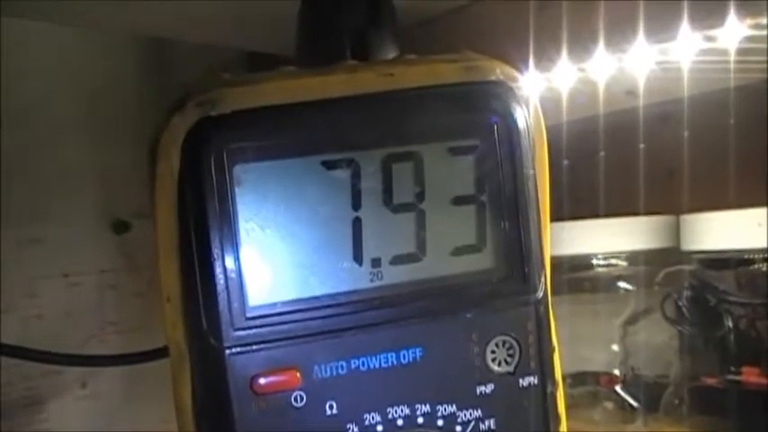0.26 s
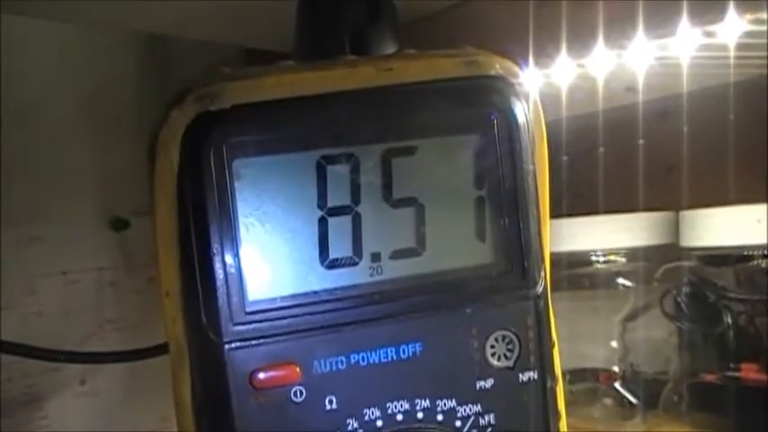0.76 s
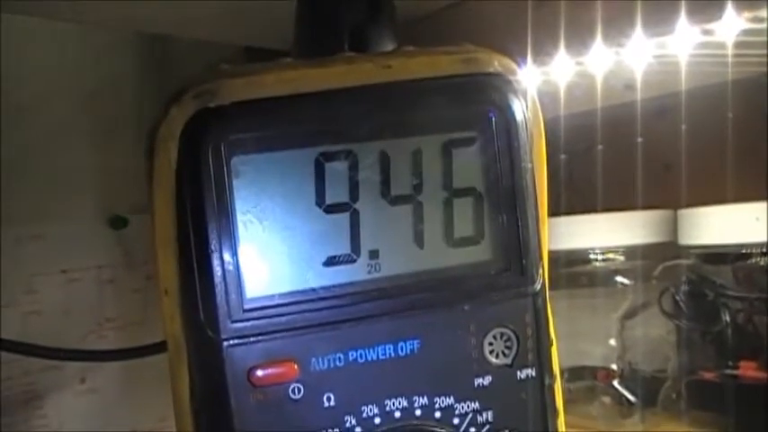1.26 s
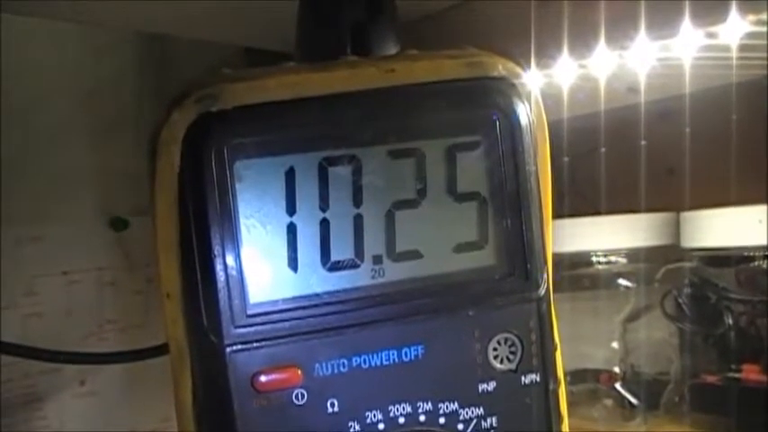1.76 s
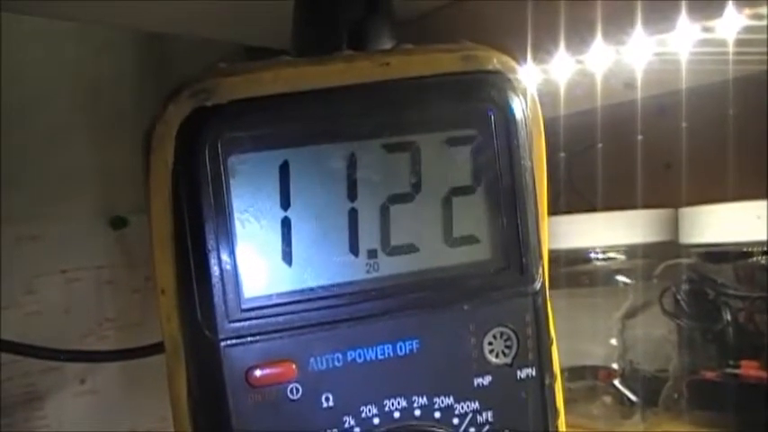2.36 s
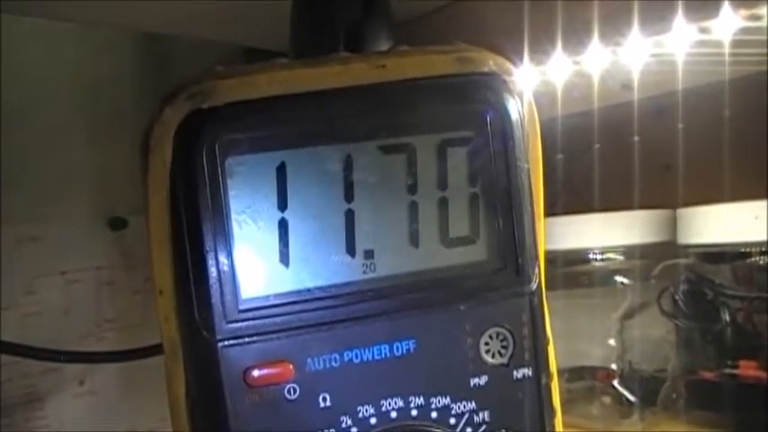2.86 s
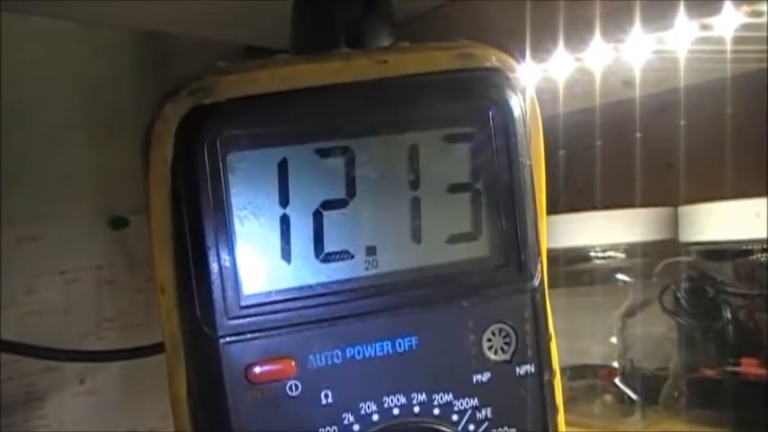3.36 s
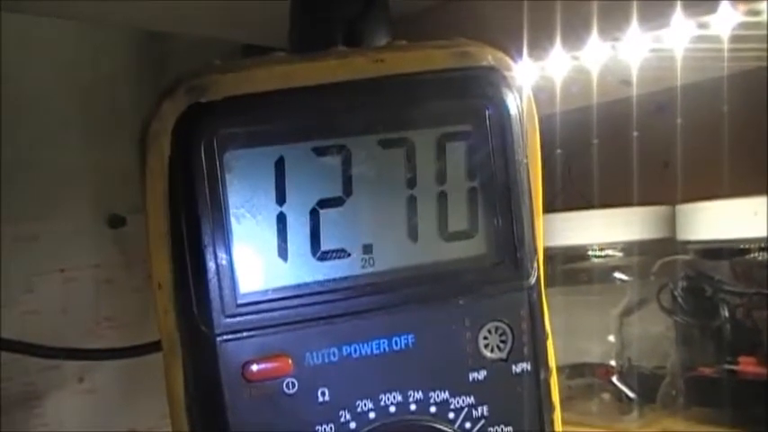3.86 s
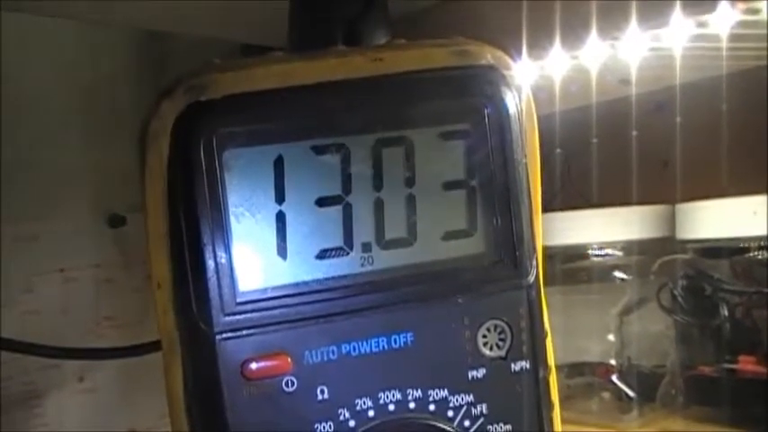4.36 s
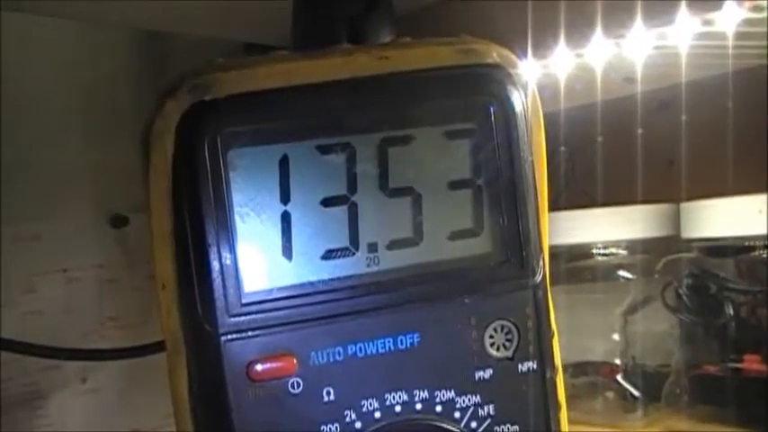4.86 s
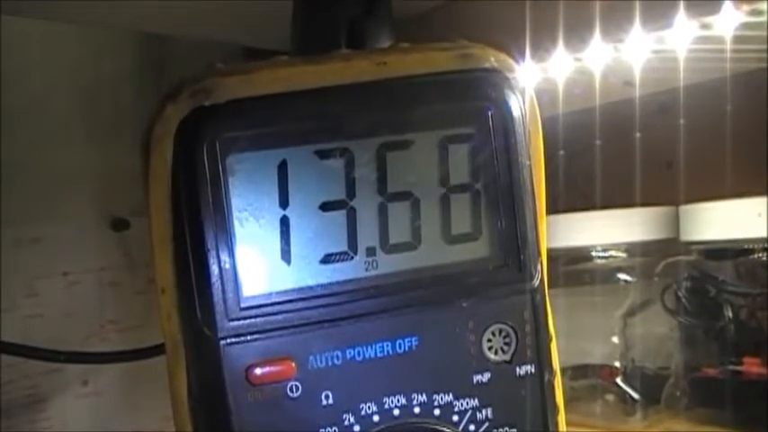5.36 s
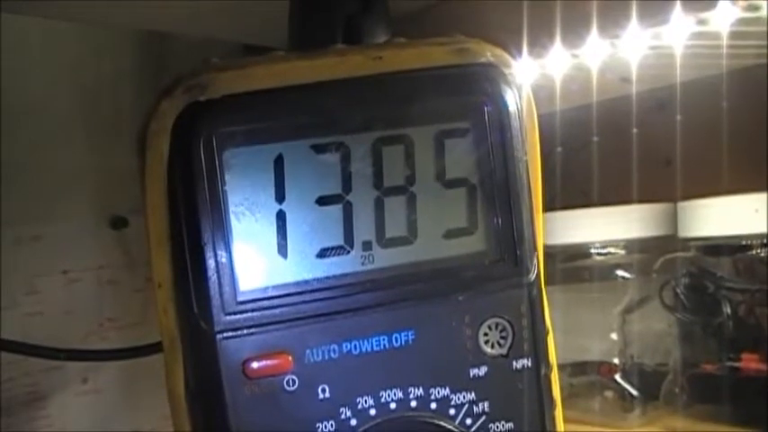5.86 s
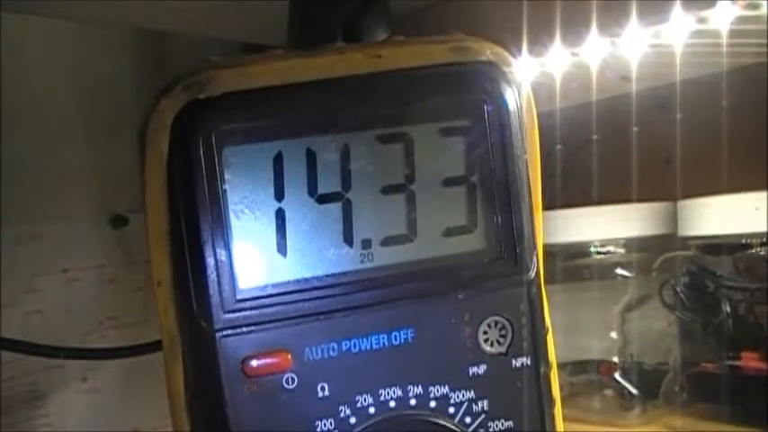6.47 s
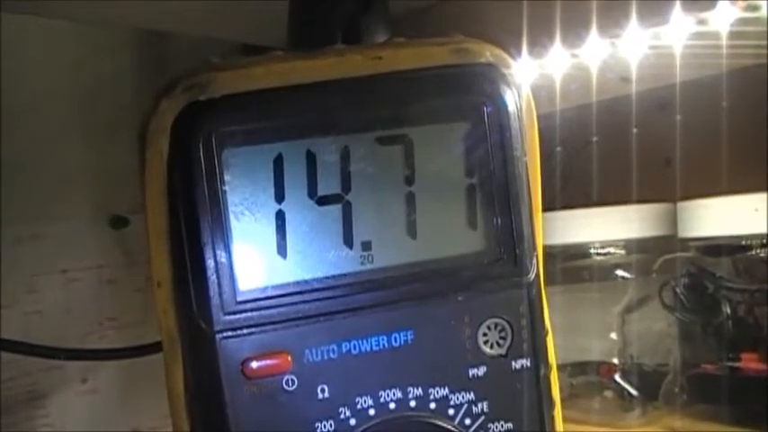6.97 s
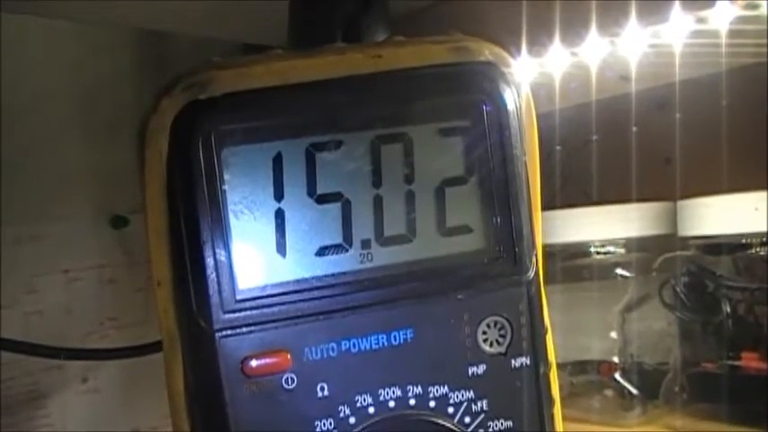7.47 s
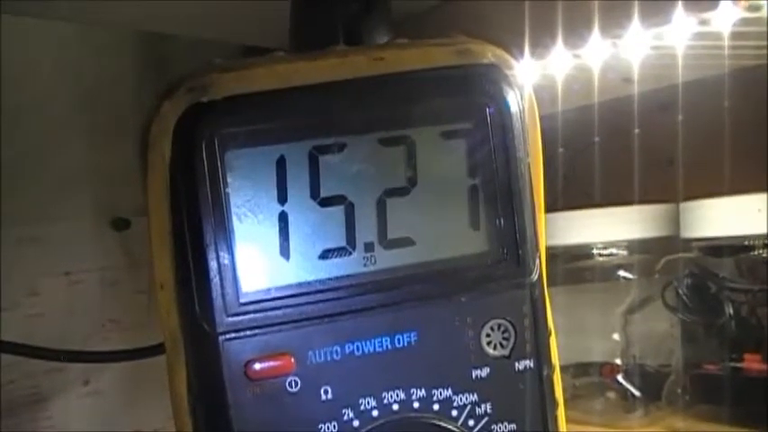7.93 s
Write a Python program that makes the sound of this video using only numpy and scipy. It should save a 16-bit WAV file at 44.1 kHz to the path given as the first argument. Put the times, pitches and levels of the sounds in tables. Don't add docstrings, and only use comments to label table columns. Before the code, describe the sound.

Steady electronic frying hiss, high and crackly, rises gradually as output is turned up, with quiet low fan drone and soft room noise beneath.

```python
import sys
import numpy as np
from scipy import signal
from scipy.fft import rfft, irfft, next_fast_len
from scipy.io import wavfile
from scipy.ndimage import map_coordinates

SR = 44100
rng = np.random.default_rng(int(sys.argv[2]) if len(sys.argv) > 2 else 0)


def voltage_ratio(level):
    return 10 ** (np.asarray(level, float) / 20)


def store_wav(level_fs):
    pcm = np.round(np.clip(np.atleast_2d(level_fs), -1, 1) * 32767)
    wavfile.write(sys.argv[1], SR, pcm.T.astype(np.int16))


N = 361619


def unit(x):
    return x / np.sqrt(np.mean(x ** 2) + 1e-20)


def along(points, hz):
    f, v = np.transpose(points)
    return np.interp(np.log(hz + 1), np.log(f + 1), v)


def wobble(rate):
    coarse = np.arange(0, N + 32, 32)
    knots = rng.standard_normal(int(N * rate / SR) + 4)
    return np.interp(np.arange(N), coarse, map_coordinates(knots, [coarse * rate / SR]))


def bumps(times, heights, width_s):
    t = np.arange(N) / SR
    return sum(h * np.exp(-0.5 * ((t - s) / width_s) ** 2) for s, h in zip(times, heights))


def filtered(x, response):
    m = next_fast_len(N + SR // 2)
    spectrum = rfft(x, m) * response(np.fft.rfftfreq(m, 1 / SR))
    return irfft(spectrum, m)[..., :N]


def humps_db(modes, hz):
    return sum(db / (1 + (2 * (hz - centre) / width) ** 4) for centre, width, db in modes)


def causal(level_db):
    cepstrum = irfft(np.log(voltage_ratio(level_db)))
    half = len(cepstrum) // 2
    cepstrum[1:half] *= 2
    cepstrum[half + 1:] = 0
    return np.exp(rfft(cepstrum))


def tones(lines, base_hz, drift_rate):
    t = np.arange(N) / SR
    out = np.zeros((2, N))
    for multiple, left_db, right_db, lag, loose in lines:
        hz = round(multiple) * base_hz
        wander = (wobble(drift_rate) + 1j * wobble(drift_rate)) / np.sqrt(2)
        sway = np.sqrt(1 - loose ** 2) + loose * wander
        tone = np.sqrt(2) * sway * np.exp(2j * np.pi * (hz * t + rng.random()))
        out[0] += voltage_ratio(left_db) * tone.real
        out[1] += voltage_ratio(right_db) * (tone * np.exp(-1j * lag)).real
    return out


def microphone_floor():
    # (frequency [Hz], level [dB per Hz])
    floor_colour = [(20, -36), (35, -20), (60, -24), (130, -10), (300, -4), (500, -1), (1000, -3.5),
                    (1600, -5.5), (2300, -10.5), (3000, -16), (5000, -15), (15000, -22)]
    # (frequency [Hz], likeness [-1 to 1])
    likeness = [(50, 0.66), (200, -0.44), (700, -0.31), (1400, 0.18), (3000, -0.57)]

    def mid_and_side(hz):
        angle = np.arccos(along(likeness, hz)) / 2
        return voltage_ratio(along(floor_colour, hz)) * np.array([np.cos(angle), np.sin(angle)])

    mid, side = filtered(rng.standard_normal((2, N)), mid_and_side)
    return voltage_ratio(-58.5) * unit(np.array([mid + side, mid - side]))


def mains_hum():
    # (multiple [-], left level [dB], right level [dB], right lag [rad], unsteadiness [0-1])
    hum_lines = [(1, -89, -92, .2, .2), (2, -79, -76, 0.54, 0.14), (4, -83, -82.5, 0.18, 0.4)]
    return tones(hum_lines, 59.95, drift_rate=4)


def fan_orders():
    # (order [-], left level [dB], right level [dB], right lag [rad], unsteadiness [0-1])
    fan_lines = [(1, -89, -91, 0.48, 0.33), (4, -67.5, -66, 0.38, 0.034), (5, -71.5, -70, 0.51, 0.24),
                 (7, -75.5, -73.5, -1.5, 0.45), (8, -83, -91, -1.4, .3), (14, -82, -78, 0.81, 0.44),
                 (20, -75.5, -101, 0.32, 0.99)]
    return tones(fan_lines, 94.36, drift_rate=9)


def loose_fan():
    # (frequency [Hz], left level [dB], right level [dB], right lag [rad], unsteadiness [0-1])
    rattle_lines = [(135.4, -91, -83, 1.5, .3), (846, -80, -76, 0.5, 1), (879, -72, -71.5, 1.5, 0.48),
                    (930, -85, -81, 1, 0.5), (1020, -87, -87, -4.5, 0), (1170, -95, -99, -3, 0),
                    (1194, -88, -74, 3, 0)]
    return tones(rattle_lines, 1, drift_rate=16)


def camera_motor():
    # (multiple [-], left level [dB], right level [dB], right lag [rad], unsteadiness [0-1])
    motor_lines = [(1, -83, -96, 1, 0.18), (2, -71.5, -65, 3, 0.1), (3, -69, -68.5, 1.08, 0.16),
                   (4, -84, -94, -4.5, .2), (6, -82, -71, -0.9, 0.49)]
    return tones(motor_lines, 360.87, drift_rate=5)


def scuffs():
    # (time [s], length [s], centre [Hz], width [Hz], level [dB])
    strokes = [(1.42, .12, 1600, 200, -67), (1.55, 0.43, 1180, 250, -67), (2.45, 0.17, 1280, 250, -69),
               (2.65, .12, 1630, 100, -68), (3.38, .08, 1250, 250, -70), (4.376, .4, 1520, 1610, -63),
               (4.68, .12, 1150, 250, -66), (5.288, 0.077, 2080, 350, -65), (5.78, 0.34, 1250, 250, -70),
               (8.03, .25, 1230, 200, -68), (4.76, .06, 880, 150, -67)]
    out = np.zeros(N)
    for s, length, centre, width, db in strokes:
        resonance = lambda hz: 1 / (1 + (2 * (hz - centre) / width) ** 2)
        rub = unit(filtered(rng.standard_normal(N), resonance))
        out += rub * bumps([s], [voltage_ratio(db)], 0.43 * length)
    return out


def paths(hz, contrast):
    # (frequency [Hz], level [dB per Hz])
    broad_left = [(1200, -40), (2000, -15), (2500, -8), (3600, -11), (5000, -2), (6500, 3), (6650, -3),
                  (7500, 4), (9000, 5), (10500, 8), (11500, 1), (13000, -3), (15200, -5), (15750, -11)]
    broad_right = [(1200, -40), (2000, -15), (2500, -8), (3600, -11), (5000, -2), (6500, 3), (6650, 1),
                   (7500, 2), (9000, 1), (10500, 8), (11500, -3), (13000, 1), (15200, -1), (15750, -10)]
    # (centre [Hz], width [Hz], height [dB])
    case_modes = [(2790, 70, 4), (2880, 50, -2), (3030, 130, 8), (3190, 50, 4), (3470, 90, 4),
                  (3550, 40, -4), (3630, 70, 3), (3730, 70, 2), (3810, 70, 6), (4030, 70, -10),
                  (4150, 60, 3), (4290, 90, 5), (4420, 50, 5), (4540, 50, 3), (4730, 130, -16),
                  (4840, 60, -3), (4990, 70, -5), (5160, 110, -5), (5420, 90, -8), (5550, 110, 4),
                  (5690, 170, -2), (5800, 60, 4), (5890, 110, -4), (6090, 190, -5), (6350, 100, -3),
                  (6560, 130, -7)]
    # (centre [Hz], width [Hz], height [dB])
    coil_left = [(6740, 260, 4), (7090, 40, -3), (7280, 50, -3), (7530, 70, 5), (7710, 140, 3),
                 (8010, 90, -3), (8230, 250, 4), (8350, 130, -6), (8770, 90, 4), (8870, 380, 7),
                 (9030, 80, -11), (9340, 80, -5), (9480, 60, -4), (9670, 120, 5), (9800, 60, -2),
                 (10000, 130, 7), (10180, 50, -7), (10280, 50, -2), (10420, 130, -7), (11070, 290, -3),
                 (11910, 80, 6), (12040, 50, -3), (12400, 120, 3), (12570, 80, 4), (12940, 210, 6),
                 (13220, 180, 8), (13760, 290, 6), (14100, 150, 5), (14640, 150, 4), (14820, 50, 2)]
    coil_right = [(6940, 140, -5), (7180, 110, 7), (7590, 270, 6), (8010, 140, 6), (8470, 70, 3),
                  (8810, 380, 10), (8910, 80, -7), (9310, 100, -4), (9560, 90, -4), (9870, 100, 4),
                  (9960, 40, -4), (10050, 100, 3), (10160, 60, -5), (10410, 110, -6), (10750, 210, -16),
                  (10810, 380, 13), (11120, 60, 3), (11210, 70, -3), (11390, 130, 4), (11680, 200, 5),
                  (11910, 60, 4), (12190, 120, 3), (12340, 80, -3), (12720, 90, -3), (13100, 80, -3),
                  (13390, 380, 6), (14260, 70, -5), (14510, 100, -3), (14810, 210, -6), (15260, 110, -5)]
    # (frequency [Hz], phase [rad])
    right_lead = [(6300, 0.25), (7500, 0.92), (8200, -1.74), (8800, 0.98), (9300, 1.2), (9800, 1.4),
                  (10600, 0.49), (11000, -1.8), (11700, 0.8), (12600, 0.96), (13300, 1.5), (13900, -.8),
                  (14600, -0.14), (15300, 2.1)]
    case_db = humps_db(case_modes, hz)
    pair = np.array([causal(along(broad, hz) + case_db + contrast * humps_db(coil, hz))
                     for broad, coil in ((broad_left, coil_left), (broad_right, coil_right))])
    shared = np.unwrap(np.angle(pair)).mean(axis=0)
    lead = np.outer([-0.5, 0.5], along(right_lead, hz))
    return abs(pair) * np.exp(1j * (shared + lead))


def bench_echoes(level_db, t60):
    t = np.arange(SR // 10) / SR
    tail = rng.standard_normal(len(t)) * voltage_ratio(-60 * t / t60) * (t > 0.009)
    tail *= voltage_ratio(level_db) / np.linalg.norm(tail)
    tail[0] = 1
    return tail


def hunting():
    return voltage_ratio(0.12 * wobble(6.4) + 0.16 * wobble(18) + 0.5 * wobble(50))


def surges_db():
    # (time [s], swing [dB])
    nudges = [
        (.5, 0.5),
        (1.03, 1.5),
        (1.2, -0.5),
        (1.7, 1),
        (1.84, -1),
        (2.72, -1),
        (3.35, 1),
        (4.04, 2),
        (5.75, 0.5),
        (8, 0.5),
    ]
    surges_per_s, mean_lift_db, surge_s = 2.5, 1.86, 0.002
    moment, chance = rng.random((2, int(surges_per_s * N / SR)))
    lift_db = -mean_lift_db * np.log(1 - chance)
    return bumps(*np.transpose(nudges), 0.025) + bumps(moment * N / SR, lift_db, surge_s)


def switching_noise():
    # (frequency [Hz], share of power [0-1])
    scattered_share = [(2000, 0.04), (3200, 0.19), (4600, 0.19), (5900, 0.09), (7000, 0.17), (10000, 0.24),
                       (12500, 0.3), (15000, 0.3)]
    direct = filtered(rng.standard_normal(N), lambda hz: np.sqrt(1 - along(scattered_share, hz)))
    scattered = filtered(rng.standard_normal((2, N)), lambda hz: np.sqrt(along(scattered_share, hz)))
    sides = filtered(direct + scattered, lambda hz: paths(hz, contrast=1.153))
    echoes = bench_echoes(level_db=-11, t60=0.042)
    return unit(signal.fftconvolve(sides, [echoes], axes=1)[:, :N])


def sizzle():
    # (time [s], level of the upper modes [dB])
    effort = [(0, -59.5), (.13, -54), (.26, -53.5), (.38, -56.5), (.5, -53), (2.2, -52), (3, -51),
              (3.9, -50.5), (5.2, -50), (5.7, -49), (6.3, -48.5), (8.2, -47.5)]
    effort_db = np.interp(np.arange(N) / SR, *np.transpose(effort))
    effort_db -= effort_db.mean()
    hiss = switching_noise()
    upper = filtered(hiss, lambda hz: 1 / (1 + (10300 / (hz + 1)) ** 12))
    case = filtered(hiss, lambda hz: 1 / (1 + (hz / 6800) ** 12))
    coil = hiss - upper - case
    parts = sum(part * hunting() * voltage_ratio(growth * effort_db)
                for part, growth in ((case, 0.68), (coil, 0.4), (upper, 1.33)))
    return voltage_ratio(-44 + surges_db()) * parts


def scene():
    machines = mains_hum() + fan_orders() + loose_fan() + camera_motor()
    return microphone_floor() + machines + scuffs() + sizzle()


def roll_off(x):
    return signal.sosfilt(signal.butter(12, 15950, fs=SR, output="sos"), x)


def record(dry):
    limited = filtered(dry, lambda hz: hz < 15725)
    return roll_off(limited)


dry = scene()
out = record(dry)
store_wav(out)
```